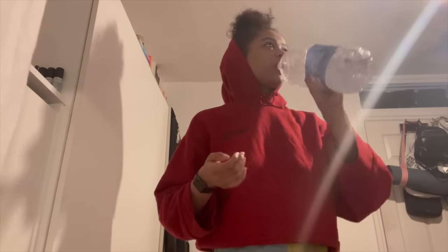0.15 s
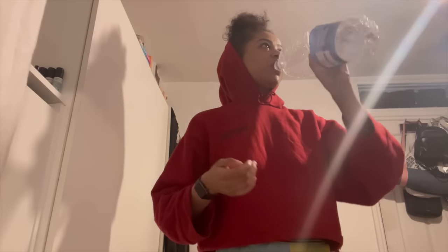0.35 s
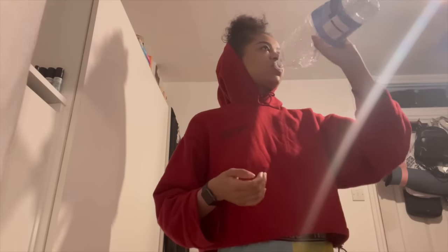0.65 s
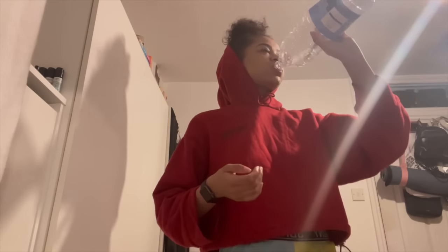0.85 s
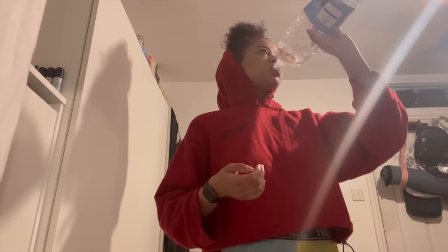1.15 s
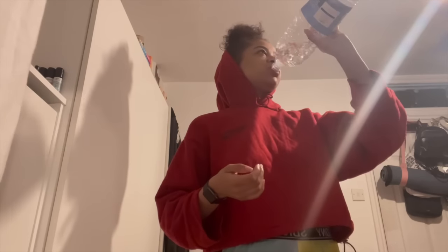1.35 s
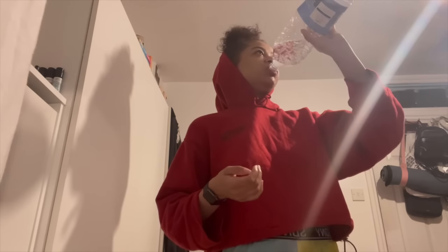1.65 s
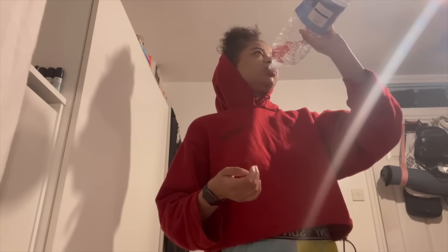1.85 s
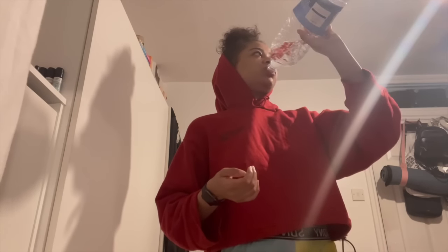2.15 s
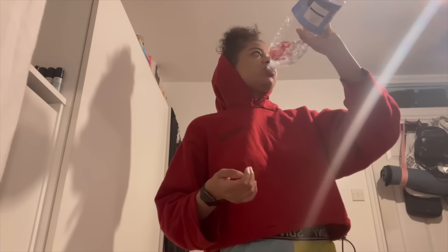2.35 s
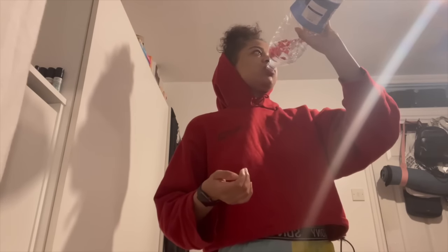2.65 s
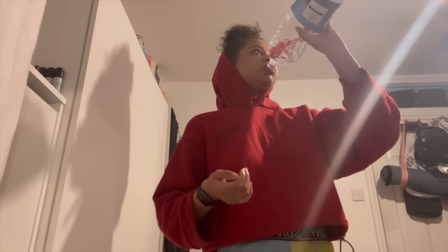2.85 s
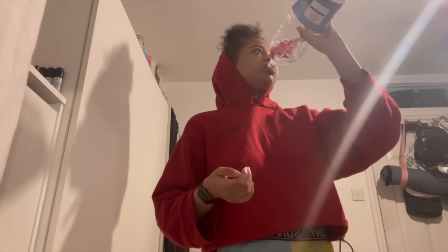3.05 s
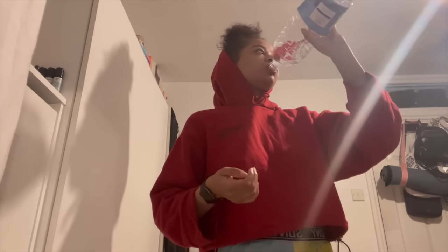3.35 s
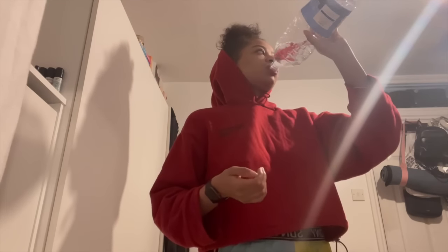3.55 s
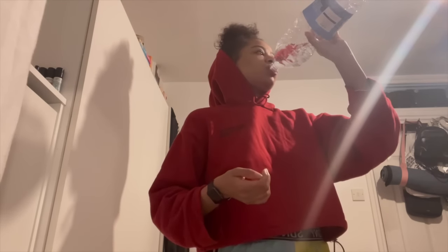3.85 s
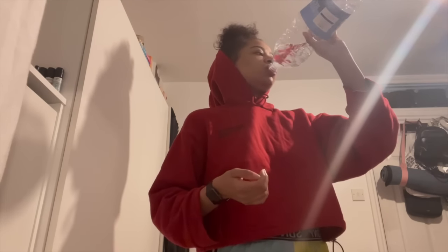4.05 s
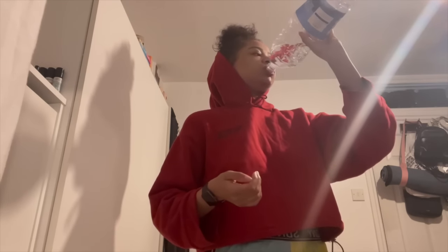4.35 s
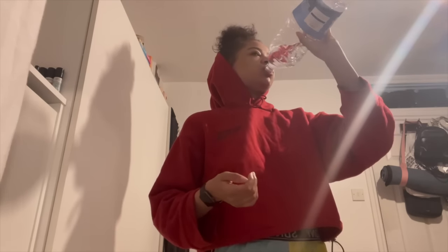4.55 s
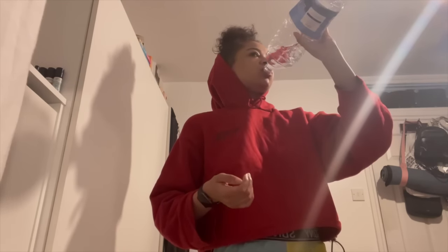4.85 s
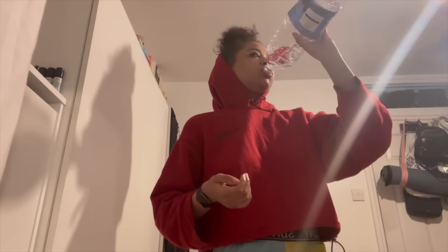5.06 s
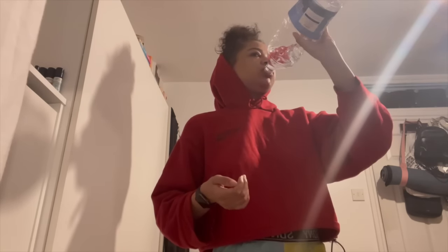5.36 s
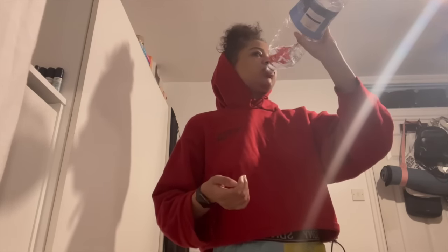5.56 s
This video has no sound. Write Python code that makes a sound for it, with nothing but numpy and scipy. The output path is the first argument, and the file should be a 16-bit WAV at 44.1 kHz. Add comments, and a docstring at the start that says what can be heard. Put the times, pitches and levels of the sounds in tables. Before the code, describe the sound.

Someone drinks from a flimsy plastic water bottle, picked up nearby by a phone in a small room. First a burst of plastic crackling, then irregular wet ticks from the lips, light crinkles and little popping bubbles that thin out. A quiet gulp comes next, then mostly steady faint hum and soft fan-like air. Late on, a single hard plastic pop rings out briefly, and the hum continues to the end.

```python
"""A thin plastic water bottle crumples in the grip as it is lifted, over a faint appliance hum.
Lips then click on the neck, water glugs and is swallowed; later suction buckles the wall in one loud snap.
Wall, throat and bubbles are damped modes; creases and wet films add shaped noise bursts.
The hum is a set of wavering tones over filtered noise. A small, quiet room adds a bounce and a short tail."""
import sys
import numpy as np
from scipy import signal
from scipy.fft import rfft, irfft
from scipy.io import wavfile
from scipy.ndimage import uniform_filter1d

SR = 44100
rng = np.random.default_rng(int(sys.argv[2]) if len(sys.argv) > 2 else 0)


def transcribe(u):
    """Save the signal u as a 16-bit wav file named by the first command-line argument.

    u: samples, shape (n,) or (channels, n), limited to [-1, 1]; the rate is SR.
    q: integer samples, one column per channel.
    """
    v = np.clip(np.atleast_2d(u).T, -1, 1)
    q = np.round(v * 32767).astype(np.int16)
    wavfile.write(sys.argv[1], SR, q)


N = 251678

# steady tones of the appliance: pitch_hz, level_db, left_minus_right_db, waver_db
HUM_TONES = [(57.8, -63.5, 5.5, 4), (97.3, -64.5, 2, 4.5), (200.9, -64, 1.5, 4), (222.3, -55.5, 6, 1),
             (387.8, -66, 15, 1), (443, -76.5, 5.5, 4), (777.2, -67, 2.5, 0.5), (888, -91.5, 7.5, 2),
             (1127, -94.5, 16.5, 2.5)]
# air noise as picked up, with a notch near 11 kHz: frequency_hz, relative_density_db (per Hz)
AIR_SPECTRUM = [(24, -38), (33, -16.5), (45, -1.5), (62, 1), (85, -9.5), (140, -2), (250, -10.5),
                (310, -17.5), (450, -21.5), (750, -27), (1000, -35.5), (1450, -39), (1900, -47.5),
                (3000, -51), (6000, -56), (9000, -52.5), (11000, -72), (15000, -55)]
# buckles of the bottle wall: start_s, level_db, pitch_ratio (to the wall modes), relative_crack_db
BUCKLES = [(0.0006, -20, 0.67, 5), (0.0035, -24, 0.91, -0.5), (0.0068, -24.5, 0.37, 3.5),
           (0.0085, -30.5, 0.2, -8), (0.0102, -25.5, 0.87, 0), (0.02, -27.5, 0.47, 8),
           (0.037, -47, 0.98, -9), (0.4712, -43.5, 0.87, 1), (0.4906, -35.5, 0.99, -15),
           (3.9762, -10.5, 1.04, 7), (3.978, -18.5, 1.13, 3.5), (3.981, -18, 0.98, 3)]
# modes of the wall at pitch ratio 1: pitch_hz, relative_level_db, t60_s
WALL_MODES = [(397, -28.5, 0.041), (565, -29.5, 0.033), (916.4, -24, 0.058), (1570, -4.5, 0.0076),
              (2016, -7, 0.01138), (2290, -17.5, 0.008), (3090, -7, 0.0074), (4137, -10, 0.0051)]
# a crack as picked up at pitch ratio 1, with a notch near 11 kHz: frequency_hz, relative_level_db
CRACK_SPECTRUM = [(200, -6), (450, -3), (1050, 4.5), (1800, 0), (3000, 12), (5300, 3), (8700, 10),
                  (10800, -20), (13500, 0), (15500, -16)]
# stretches of fine crinkling: start_s, length_s, level_db, centre_hz
CRINKLE_STRETCHES = [(0.001, 0.028, -41, 1087), (0.492, 0.028, -53, 1140), (0.611, 0.087, -65, 1330),
                     (0.678, 0.076, -59.5, 2500), (0.872, 0.031, -61, 3000), (1.018, 0.045, -65.5, 2620),
                     (1.14, 0.063, -73, 2490)]
# wet clicks of lips and water at the neck: start_s, level_db, centre_hz, spray_half_width_octaves
LIP_CLICKS = [(0.2713, -50, 1960, 1.45), (0.2927, -48, 8170, 0.35), (0.3335, -39, 1410, 0.76),
              (0.374, -39.5, 1770, 2.3), (0.4237, -47.5, 8150, 1.2), (0.4223, -51.5, 2730, 1.1),
              (0.463, -49, 2600, 0.7), (0.467, -39.5, 8000, 0.18), (0.4693, -35.5, 3730, 0.76),
              (0.4915, -38, 2650, 0.24), (0.616, -52, 1940, 1), (0.6565, -47, 1400, 0.69),
              (0.6825, -59, 1700, 0.7), (0.685, -42, 2260, 1.2), (.698, -51, 3320, 0.51),
              (.707, -51, 2490, .3), (0.7167, -44, 2280, 1.3), (0.7375, -43.5, 2200, 1.4),
              (0.7387, -44, 3300, .7), (.7655, -61, 2230, 0.9), (0.836, -59, 1890, .5),
              (0.8776, -51, 2380, 1.4), (0.887, -44, 4770, 0.72), (0.899, -44.5, 7850, 0.61),
              (0.909, -60, 2100, 0.69), (1.025, -51, 3050, 1.2), (1.049, -53, 2860, 0.9),
              (1.058, -60, 2600, 0.4), (1.0934, -49.5, 4400, 0.22), (1.153, -52, 4150, .2),
              (1.175, -56, 3720, 1.2), (1.186, -59, 7640, .3), (1.2238, -55.5, 6570, 0.055),
              (1.307, -58, 6760, 0.046), (1.31, -49, 2550, 1), (1.897, -61.5, 2470, 0.54),
              (2.171, -47, 1450, 0.13), (2.5173, -55, 2360, .3)]
# single bubbles, low and high, each ringing at its own pitch: start_s, level_db, pitch_hz, t60_s
SINGLE_BUBBLES = [(.335, -36.5, 626, 0.0053), (0.4665, -37.5, 2190, 0.012), (0.4905, -47.5, 3100, 0.0045),
                  (.496, -33.5, 626, 0.0052), (.617, -43.5, 500, 0.011), (.631, -53, 460, 0.0091),
                  (0.643, -57, 3700, 0.011), (0.658, -38, 594, 0.0052), (.686, -44, 860, 0.0052),
                  (.717, -42.5, 725, 0.0084), (.738, -38.5, 563, 0.0053), (0.7385, -48, 3650, 0.0041),
                  (0.748, -60, 4160, 0.018), (.754, -44.5, 805, 0.0063), (0.8869, -43.5, 3800, 0.0087),
                  (0.903, -46, 1320, 0.0078), (0.9111, -40, 1180, 0.011), (.922, -37, 750, 0.0048),
                  (0.943, -63, 1080, 0.0097), (0.975, -58, 2430, 0.015), (1.021, -56, 1380, 0.014),
                  (1.038, -55, 3000, 0.0078), (1.0453, -42.5, 1117, 0.014), (1.095, -49.5, 2010, 0.005),
                  (1.0935, -54, 4330, 0.0094), (1.1, -63, 4660, 0.01), (1.146, -52, 1520, 0.012),
                  (1.148, -50, 3560, .008), (1.159, -51.5, 2520, 0.01), (1.2232, -42.5, 704, 0.0084),
                  (1.225, -56, 1430, 0.024), (1.311, -42.5, 1070, 0.0056), (1.996, -68, 2520, 0.011),
                  (2.185, -68, 2310, 0.017), (2.192, -51, 1370, .008), (2.2059, -53, 1150, 0.0065),
                  (2.301, -55, 1250, 0.0064), (2.373, -60.5, 2380, 0.01)]
# pulses of the swallows: start_s, level_db, pitch_ratio (to the throat modes), relative_upper_modes_db
SWALLOW_PULSES = [(2.028, -54, 0.87, 7), (2.04, -55, 1.16, -2), (2.178, -45.5, 0.89, 7),
                  (2.18, -51, 0.99, -9), (2.188, -43, 1.06, -4.5), (2.1925, -42, 0.97, -10),
                  (2.202, -50, 1.04, 11), (2.211, -56, 1.1, 2), (2.2155, -51, 0.88, -12),
                  (4.571, -60, 1.23, -11)]
# modes of the throat at pitch ratio 1: pitch_hz, relative_level_db, t60_s
THROAT_MODES = [(449, 5.5, 0.03), (792, -10, 0.0071), (960, -5, 0.018), (1470, -15.5, 0.017)]

T = np.arange(N) / SR
RING = T[:SR // 8]  # time axis of one short event
SWELL_CYCLES = 1.1  # usual onset of a mode
AIR_DB = -55
CRACK_T60_S, CRACK_RISE_S = 0.009, 0.0003
TEAR_DB = 0  # tearing relative to the jolt
BEND_DELAY_S = 0.0013  # travel time of a 1 kHz bending wave across the wall; higher ones arrive sooner
CRINKLES_PER_S, CRINKLE_SCATTER_DB = 260, 7
CLICK_T60_S = 0.0019  # the film damps every click alike
SPRAY_PER_S, SPRAY_T60_S = 5000, 0.011
# while water runs down the neck, small bubbles come at random
POUR_START_S, POUR_END_S, POUR_PER_S = 0.89, 1.33, 45
POUR_DB, POUR_TILT_DB, POUR_SCATTER_DB, POUR_T60_S = -59.5, -1.5, -4.5, 0.006
POUR_START_HZ, POUR_END_HZ, POUR_OCTAVES = 1520, 2320, 1  # the bubbles get smaller as the neck fills
BUBBLE_SWELL = 0.11  # share of the ring time that a bubble takes to swell
CEILING_S, CEILING_DB = 0.0048, -7
BASS_T60_S, ROOM_T60_S, TREBLE_T60_S = 0.22, 0.17, 0.165
RING_WET_DB, RING_BUILD_S, CREASE_BUILD_S = -5.5, 0.005, 0.005
MOUTH_WET_DB, MOUTH_BUILD_S = -1.5, 0.003
GLUG_WET_DB, GLUG_BUILD_S = -4.5, 0.003
TOP_HZ = 15600


def undb(db):
    """Logarithmic level: decibels to amplitude gain."""
    return 10 ** (np.asarray(db) / 20)


def unit(x):
    """Normalisation: scale to rms 1."""
    return x / np.sqrt(np.mean(x ** 2))


def decay(t, t60):
    """Exponential decay: 60 dB down after t60."""
    return np.exp(-np.log(1000) * t / t60)


def colour(points, size):
    """Spectral shaping: gain per FFT bin, interpolated in dB over log frequency."""
    hz, db = np.transpose(points)
    bins_hz = np.fft.rfftfreq(size, 1 / SR)
    return undb(np.interp(np.log(bins_hz + 1), np.log(hz), db))


def add(track, s, sound):
    """Superposition: mix a sound in at time s."""
    i = max(int(s * SR), 0)
    track[i:i + len(sound)] += sound[:N - i]


def walk(rate):
    """Low-passed random motion: a smooth wander with spread near 1."""
    k = int(SR / rate)
    steps = np.repeat(rng.standard_normal(N // k + 1), k)
    smooth = uniform_filter1d(uniform_filter1d(steps, k), k)
    return unit(smooth[:N])


def mode(hz, t60, glide=0, swell=SWELL_CYCLES):
    """Damped resonance: a sine swells for about swell cycles; its pitch rises by the share glide as it dies."""
    t60 = max(t60, 1e-4)
    shape = decay(RING, t60) * (1 - np.exp(-(RING * hz / swell) ** 2))
    pitch_hz = hz * (1 + glide * np.minimum(RING / t60, 1))
    phase = 2 * np.pi * np.cumsum(pitch_hz) / SR
    return np.sin(phase) * shape / shape.max()


def hum(drift_hz=0.49):
    """Tonal machine noise: motor tones waver in level and a little in pitch."""
    out = np.zeros((2, N))
    for hz, db, pan_db, waver_db in HUM_TONES:
        wandering_hz = hz + drift_hz * waver_db * walk(7.6)
        phase = 2 * np.pi * (np.cumsum(wandering_hz) / SR + rng.random())
        level_db = db + waver_db * walk(12) + np.array([[pan_db], [-pan_db]]) / 2
        out += np.sqrt(2) * np.sin(phase) * undb(level_db)
    return out


def air(spread_hz=600):
    """Broadband flow noise: the bass of the soft fan noise is alike at both microphones."""
    mid, side = rfft(rng.standard_normal((2, N))) * colour(AIR_SPECTRUM, N)
    side = side * np.clip(np.fft.rfftfreq(N, 1 / SR) / spread_hz, .15, .85)
    return unit(irfft(np.array([mid + side, mid - side]), N)) * undb(AIR_DB)


def flow(db=-86, swell_db=-2.0):
    """Modulated band noise: a narrow band of the appliance's hiss swells and fades."""
    band = signal.butter(2, [1700, 2150], "band", fs=SR, output="sos")
    hiss = signal.sosfilt(band, rng.standard_normal((2, N)))
    return unit(hiss) * undb(db + swell_db * walk(2.7))


def wall():
    """Modal vibration: each buckle rings the wall; water behind a panel loads it and lowers its pitch."""
    out = np.zeros(N)
    for s, db, pitch, _ in BUCKLES:
        ring = np.zeros(len(RING))
        for k, (hz, mode_db, t60) in enumerate(WALL_MODES):
            # neighbouring modes start in opposite phase
            ring += (-1) ** k * undb(mode_db) * mode(hz * pitch, t60 / pitch)
        add(out, s, undb(db) * ring)
    return out


def cracks(crack_db=-13):
    """Bending-wave dispersion: a flipping crease's jolt arrives treble first, with a few ms of tearing."""
    out = np.zeros(N)
    hz = np.fft.rfftfreq(len(RING), 1 / SR)
    # delay falls with the square root of frequency
    spread = np.exp(-4j * np.pi * BEND_DELAY_S * np.sqrt(hz * 10 ** 3))
    burst = decay(RING, CRACK_T60_S) * (1 - np.exp(-RING / CRACK_RISE_S))
    jolt = np.linalg.norm(burst)  # flat spectrum of a single impulse
    for s, db, pitch, sharp_db in BUCKLES:
        tear = undb(TEAR_DB) * rfft(burst * rng.standard_normal(len(RING)))
        spectrum = unit(colour([(f * pitch, d) for f, d in CRACK_SPECTRUM], len(RING)))
        crack = irfft((jolt + tear) * spread * spectrum, len(RING))
        # a small wall radiates no bass, and a loaded panel is duller
        band = signal.butter(3, [250, min(16500 * pitch, SR / 2.4)], "band", fs=SR, output="sos")
        sound = signal.sosfilt(band, crack[:len(RING) // 2])
        add(out, s, undb(db + sharp_db + crack_db) * sound)
    return out


def crinkle(scatter_octaves=0.792, cycles=13, tilt_db=-4):
    """Random slip: tiny creases slip at random, each with its own size and pitch; higher ones are weaker."""
    out = np.zeros(N)
    for start, length, db, centre_hz in CRINKLE_STRETCHES:
        slips = rng.uniform(-1, 1, (64, 3))[:int(length * CRINKLES_PER_S)]
        for when, size, pitch in slips:
            hz = min(centre_hz * 2 ** (scatter_octaves * pitch), SR / 3)
            gain = undb(db + CRINKLE_SCATTER_DB * size + tilt_db * pitch)
            add(out, start + length * (when + 1) / 2, gain * mode(hz, cycles / hz))
    return out


def lips(spray_db=-6, spray_rise_s=0.0002):
    """Film rupture: a parting wet film rings a small cavity and sprays crackle around its pitch."""
    out = np.zeros(N)
    for s, db, hz, octaves in LIP_CLICKS:
        struck = rng.random(len(RING)) < SPRAY_PER_S / SR
        grains = unit(rng.standard_normal(len(RING)) * struck)
        spray = grains * decay(RING, SPRAY_T60_S) * (1 - np.exp(-RING / spray_rise_s))
        # gentle skirt below the pitch, steep one above
        lower = signal.butter(1, hz / 2 ** octaves, "high", fs=SR, output="sos")
        upper = signal.butter(6, min(hz * 2 ** octaves, SR / 3), fs=SR, output="sos")
        spray = signal.sosfilt(upper, signal.sosfilt(lower, spray))
        add(out, s, undb(db) * (mode(hz, CLICK_T60_S) + undb(spray_db) * spray))
    return signal.sosfilt(signal.butter(4, 9500, fs=SR, output="sos"), out)


def bubble(hz, t60, glide=0.026):
    """Bubble resonance: it swells smoothly, then rings out while rising slightly in pitch."""
    return mode(hz, t60, glide, swell=BUBBLE_SWELL * t60 * hz)


def water():
    """Bubble resonance in a filling neck: single bubbles stand over a random gurgle that rises in pitch."""
    out = np.zeros(N)
    for s, db, hz, t60 in SINGLE_BUBBLES:
        add(out, s, undb(db) * bubble(hz, t60))
    length = POUR_END_S - POUR_START_S
    gurgle = rng.uniform(-1, 1, (128, 3))[:int(length * POUR_PER_S)]
    for when, size, pitch in gurgle:
        filled = (when + 1) / 2
        centre_hz = POUR_START_HZ * (POUR_END_HZ / POUR_START_HZ) ** filled
        hz = centre_hz * 2 ** (POUR_OCTAVES * pitch)
        gain = undb(POUR_DB + POUR_SCATTER_DB * size + POUR_TILT_DB * pitch)
        add(out, POUR_START_S + length * filled, gain * bubble(hz, POUR_T60_S))
    return out


def gulps():
    """Cavity resonance: water squeezed in pulses rings a throat that changes shape between them."""
    out = np.zeros(N)
    for s, db, pitch, bright_db in SWALLOW_PULSES:
        low, *upper = [undb(mode_db) * mode(hz * pitch, t60, swell=SWELL_CYCLES * 0.49)
                       for hz, mode_db, t60 in THROAT_MODES]
        add(out, s, undb(db) * (low + undb(bright_db) * sum(upper)))
    return out


def diffuse(t, smooth_hz=90):
    """Diffuse field: left and right noise, evened out so that no pitch rings more than its neighbours."""
    noise = rng.standard_normal((2, len(t)))
    power = np.abs(rfft(noise * decay(t, ROOM_T60_S))) ** 2
    bins = max(int(smooth_hz * len(t) / SR), 1)
    return irfft(rfft(noise) / np.sqrt(uniform_filter1d(power, bins)), len(t))


def room(x, wet_db, build_s, lag_s, treble_db, pan_db=0):
    """Reverberation: direct sound (left later by lag_s), a ceiling bounce and a tail whose bass lasts longest."""
    t = T[:SR // 3]
    noise = diffuse(t)

    def below(hz):
        """Zero-phase low-pass: the noise below hz."""
        return signal.sosfiltfilt(signal.butter(2, hz, fs=SR, output="sos"), noise, padtype="even")

    bass, body = below(660), below(3500)
    tail = bass * decay(t, BASS_T60_S) + (body - bass) * decay(t, ROOM_T60_S)
    tail = tail + undb(treble_db) * (noise - body) * decay(t, TREBLE_T60_S)
    tail = tail * (1 - np.exp(-(t / build_s) ** 2))  # reflections take a moment to arrive
    response = undb(wet_db) * tail / np.linalg.norm(tail, axis=1, keepdims=True)
    for channel, (direct, bounce) in enumerate([(lag_s, CEILING_S + .0003), (0, CEILING_S)]):
        response[channel, int(direct * SR)] += 1
        response[channel, int(bounce * SR)] += undb(CEILING_DB)
    heard = signal.fftconvolve(x[None], response, axes=1)[:, :N]
    return heard * undb(np.array([[pan_db], [-pan_db]]) / 2)


def scene():
    """Directivity and superposition: the flat wall beams its ring, creases radiate all round, over the hum."""
    appliance = hum() + air() + flow()
    ring = room(wall(), RING_WET_DB, RING_BUILD_S, lag_s=.00008, treble_db=-2.0, pan_db=-2.0)
    creases = room(cracks() + crinkle(), -2.0, CREASE_BUILD_S, lag_s=.000035, treble_db=-4.5)
    mouth = room(lips(), MOUTH_WET_DB, MOUTH_BUILD_S, lag_s=0.00014, treble_db=2.0)
    glugs = room(water(), GLUG_WET_DB, GLUG_BUILD_S, lag_s=0.00012, treble_db=-5.0)
    swallows = room(gulps(), -9.5, MOUTH_BUILD_S, lag_s=0.00012, treble_db=-7.0, pan_db=1.5)
    return appliance + ring + creases + mouth + glugs + swallows


def record(dry):
    """Band limiting: the phone cuts the top with a steep elliptic low-pass."""
    return signal.sosfilt(signal.ellip(8, .2, 70, TOP_HZ, fs=SR, output="sos"), dry)


dry = scene()
out = record(dry)
transcribe(out)
```